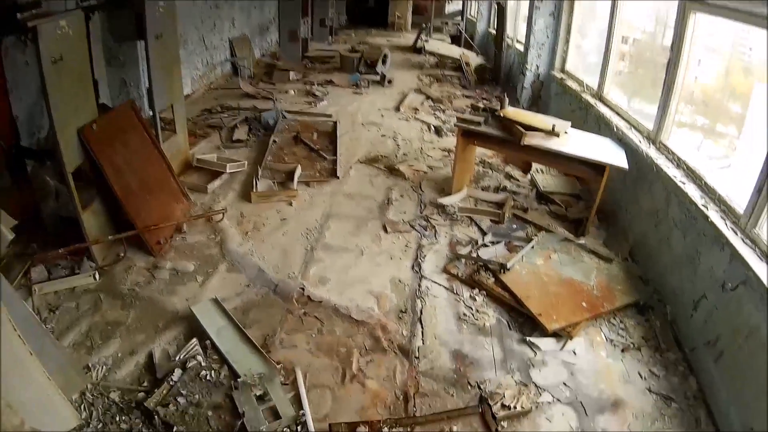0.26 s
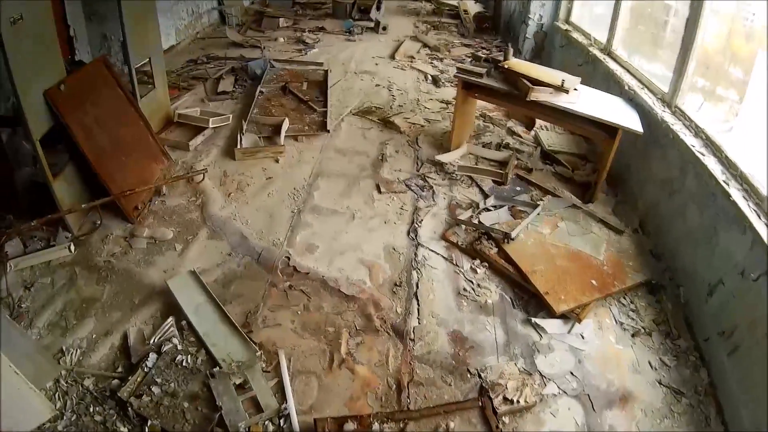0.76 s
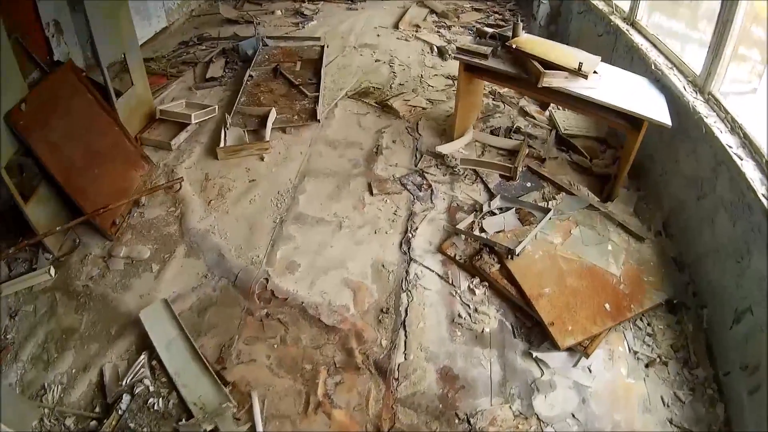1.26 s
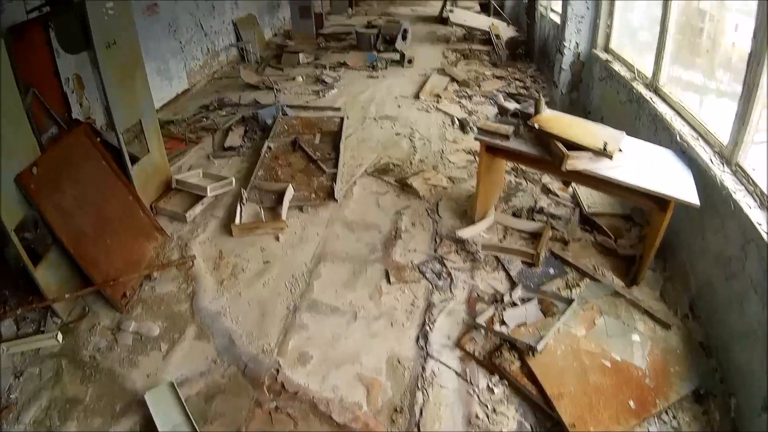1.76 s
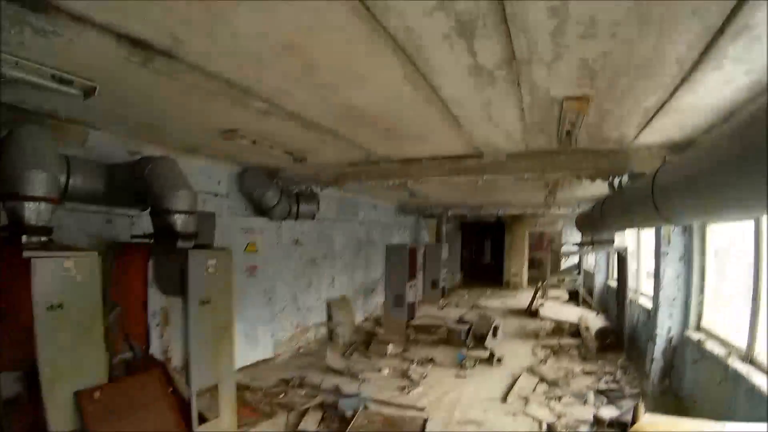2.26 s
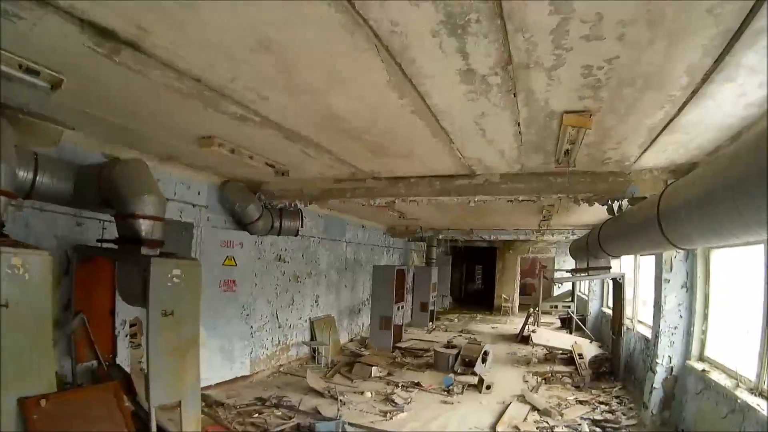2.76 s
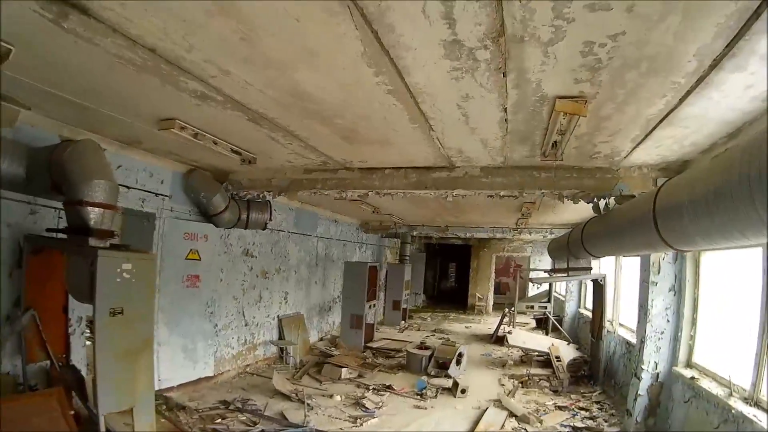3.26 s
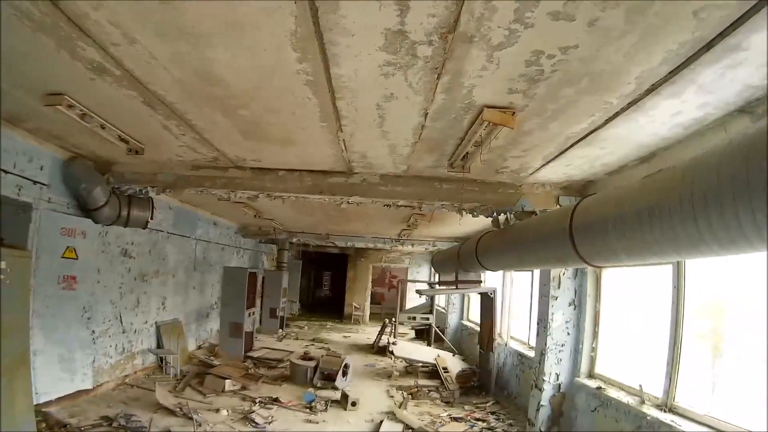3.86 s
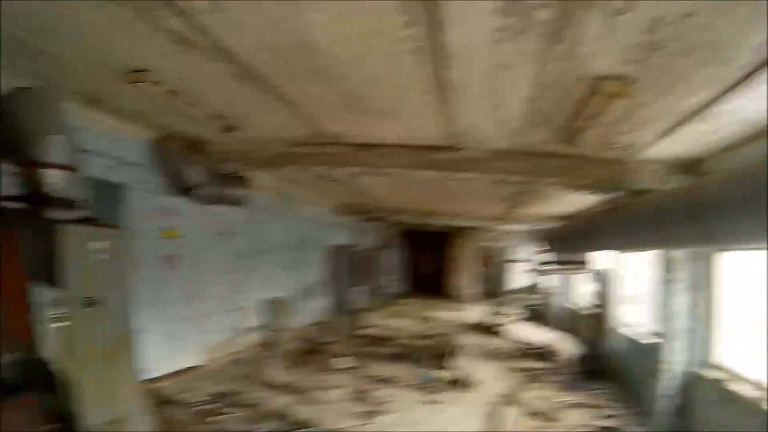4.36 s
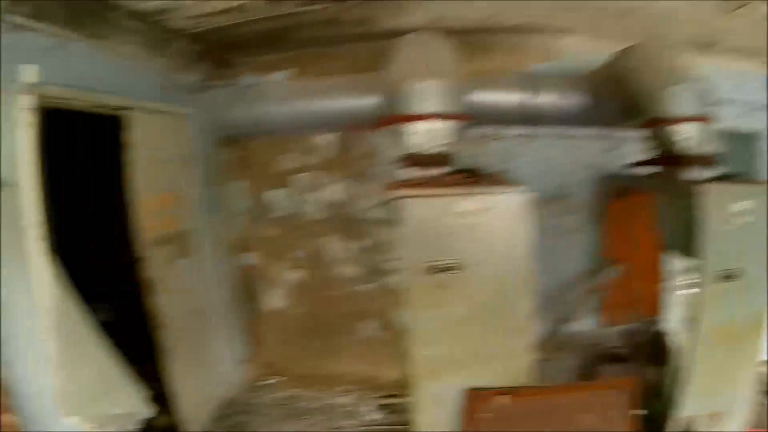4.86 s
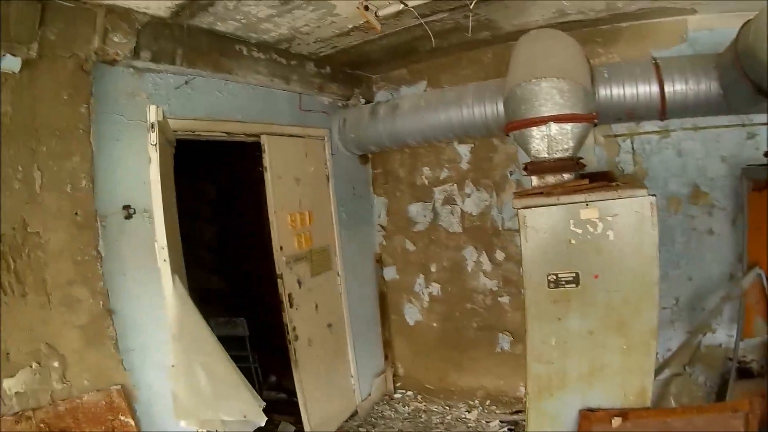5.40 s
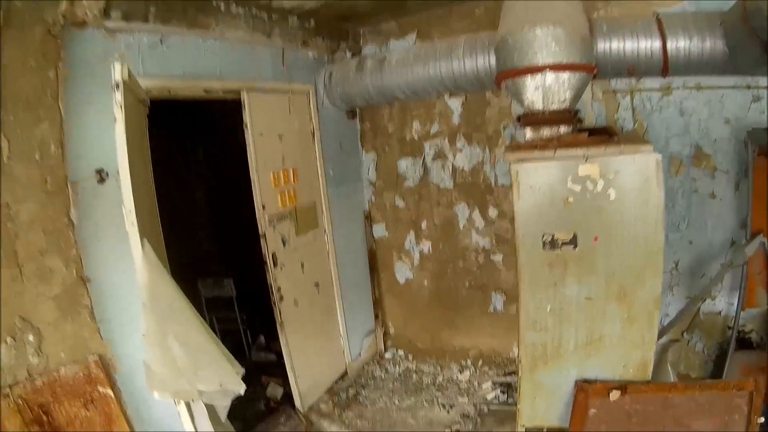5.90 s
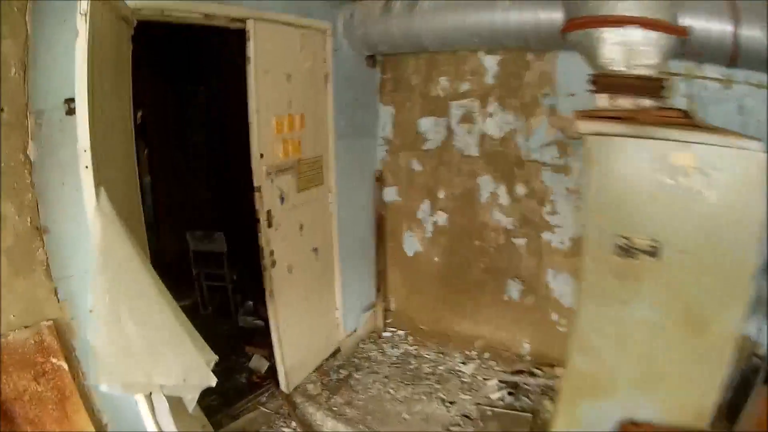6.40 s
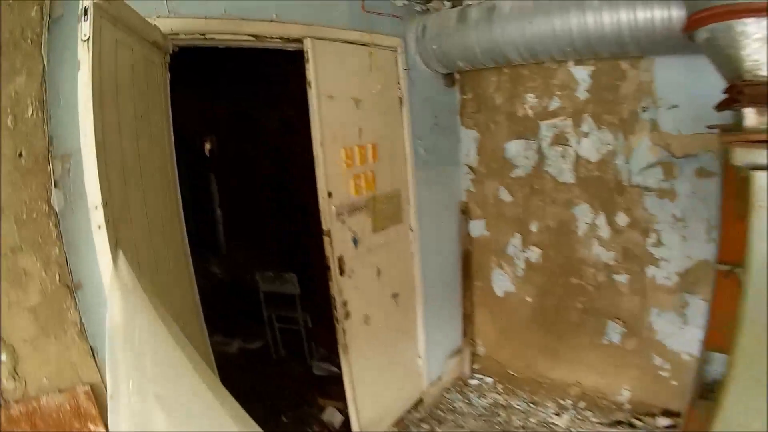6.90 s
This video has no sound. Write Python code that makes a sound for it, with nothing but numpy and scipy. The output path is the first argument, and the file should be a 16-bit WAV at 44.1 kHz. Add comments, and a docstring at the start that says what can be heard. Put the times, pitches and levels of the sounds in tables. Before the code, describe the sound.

Grit stirs faintly under a shoe at the start, in a bare, abandoned concrete hall. After a soft heel thump near 0.8 seconds, four slow footsteps crush broken plaster and tile, at about 1.1, 1.9, 2.8 and 3.5 seconds. Each is a few hard cracks and bright ticks over a short shower of crumbs and grit; the fourth is a little softer. From 4 to 5 seconds the feet shift on the rubble with lighter crunches and a soft knock. After a brief lull, faint shuffles and small crackles come between about 5.7 and 7.1 seconds. The feet are close below a hand-held microphone. The hall adds a short echo and a faint, narrow ring after each step. Underneath lie quiet room tone and hiss, a barely audible thin whine and a few tiny handling bumps.

```python
"""Grit stirs faintly under a shoe, then four slow steps crush plaster and tile in a bare concrete hall.
Each step is a few hard cracks over showers of crumbs and grit that last while the sole bears down.
Afterwards the feet shift lightly on the rubble, close below the microphone of a hand-held camera.
Floor, walls and ceiling answer, and a faint narrow ring hangs on.
The camera adds hiss, a thin whine and small handling bumps."""
import sys
import numpy as np
from scipy import signal
from scipy.fft import rfft, irfft, next_fast_len
from scipy.io import wavfile
from scipy.ndimage import map_coordinates

SR = 44100
rng = np.random.default_rng(int(sys.argv[2]) if len(sys.argv) > 2 else 0)


def generate_wav(sig):
    """Save sig (samples, or channels by samples) to the path in sys.argv[1] as 16-bit PCM at SR."""
    pcm = np.round(np.clip(np.atleast_2d(sig).T, -1, 1) * 32767).astype(np.int16)
    wavfile.write(sys.argv[1], SR, pcm)


N = 314874
TOP_HZ = 15700  # the camera's band limit


def amp(db):
    """Decibels to gain."""
    return 10 ** (np.asarray(db) / 20)


def unit(x):
    """Scale to rms 1."""
    return x / np.sqrt(np.mean(x ** 2) + 1e-20)


def along(points, hz):
    """Interpolate (Hz, value) points on a log frequency axis."""
    point_hz, values = np.transpose(points)
    return np.interp(np.log(hz + 1), np.log(point_hz + 1), values)


def below(hz, corner_hz):
    """Gain of a steep low-pass."""
    return 1 / (1 + (hz / corner_hz) ** 6)


def wobble(rate):
    """A smooth random curve, rate knots a second."""
    knots = rng.standard_normal(int(N * rate / SR) + 4)
    return map_coordinates(knots, [np.arange(N) * rate / SR])


def filtered(x, response):
    """Shape x by a gain given as a function of Hz."""
    size = next_fast_len(N + SR // 2)
    return irfft(rfft(x, size) * response(np.fft.rfftfreq(size, 1 / SR)), size)[:N]


def minimum_phase(gain):
    """The shortest impulse response with this gain."""
    cepstrum = irfft(np.log(np.maximum(gain, 1e-6)))
    half = len(cepstrum) // 2
    cepstrum[1:half] *= 2
    cepstrum[half + 1:] = 0
    return irfft(np.exp(rfft(cepstrum)))


def add_at(track, start_s, sound):
    """Mix a sound in from start_s, as far as the track reaches."""
    span = track[round(start_s * SR):][:len(sound)]
    span += sound[:len(span)]


# Room tone and hiss at the microphone. Each row: frequency in Hz, relative spectral level in dB.
ROOM_TONE = [(20, -7), (50, -17.5), (120, -15.5), (230, -17), (550, -22.5), (1000, -27.5), (2500, -35),
             (6000, -37), (15000, -37.5)]


def background(air_db=-60, whine_db=-80.5, whine_hz=8660):
    """Still air and microphone hiss, wavering slightly, with a narrow electronic whine."""
    air = unit(filtered(rng.standard_normal(N), lambda hz: amp(along(ROOM_TONE, hz))))
    whine = unit(filtered(rng.standard_normal(N), lambda hz: below(hz - whine_hz, 75)))
    return amp(air_db + 0.4 * wobble(1.9)) * air + amp(whine_db) * whine


# The grip shifts on the camera, right at the microphone. Each row: start in seconds, relative level in dB.
GRIP_BUMPS = [(0.027, -47.5), (0.469, -47.5), (5.213, -45), (5.544, -47.5), (6.042, -47), (7.027, -45.5)]


def handling(level_db=-3, settle_s=0.076, soft_hz=260):
    """Small jolts of the camera body: a soft step of pressure that leaks away."""
    out, t = np.zeros(N), np.arange(SR // 2) / SR
    jolt = np.exp(-t / settle_s) - np.exp(-2 * np.pi * soft_hz * t)
    for start_s, db in GRIP_BUMPS:
        add_at(out, start_s, amp(db + level_db) * jolt)
    return out


def duct_ring(feet, level_db=-25, centre_hz=1420, width_hz=330, t60_s=1.8):
    """A faint, narrow ring hangs in the hall after each step, as from sheet-steel ducts and cabinets."""
    t = np.arange(2 * SR) / SR
    edges_hz = [centre_hz - width_hz / 2, centre_hz + width_hz / 2]
    band = signal.butter(2, edges_hz, "bandpass", fs=SR, output="sos")
    tail = rng.standard_normal(len(t)) * amp(-60 * t / t60_s)
    ring = signal.sosfilt(band, tail / np.linalg.norm(tail))
    return amp(level_db) * signal.fftconvolve(feet, ring)[:N]


# The bare concrete hall all around. Each row: frequency in Hz, time to fall 60 dB in seconds.
HALL_DECAY = [(150, 0.81), (500, 0.48), (1300, 0.49), (4000, 0.39), (8000, 0.32), (15000, 0.31)]


def hall(early_db, tail_db, early_life_s=0.005, build_s=0.0034, echoes_per_s=2500):
    """From one spot to the microphone: direct sound, echoes off floor and cabinets, the long tail."""
    t = np.arange(SR * 3 // 5) / SR
    hz, frame_s, spectra = signal.stft(rng.standard_normal(len(t)), SR, nperseg=256)
    decay = amp(-60 * frame_s / along(HALL_DECAY, hz)[:, None])
    tail = signal.istft(spectra * decay, SR, nperseg=256)[1][:len(t)]
    tail *= 1 - np.exp(-t / build_s)
    early = rng.standard_normal(len(t)) * (rng.random(len(t)) < echoes_per_s / SR)
    early *= np.sqrt(t) * np.exp(-2 * t / early_life_s)
    response = amp(early_db) * early / np.linalg.norm(early) + amp(tail_db) * tail / np.linalg.norm(tail)
    response[0] += 1  # direct sound
    return response


# Hollow thumps of heels and loose boards, down at floor level.
# Each row: start in seconds, level in dB before the hall, pitch in Hz.
HEEL_THUMPS = [(0.755, -35.5, 474), (0.761, -32, 278), (0.793, -38.5, 407), (1.07, -34, 278),
               (1.885, -39, 188), (1.922, -36, 183), (3.348, -35, 450), (4.221, -44, 323),
               (4.725, -33.5, 476), (6.506, -39.5, 330)]


def thumps(cycles_to_peak=0.46, lowest_hz=140):
    """A board or the bare floor gives a few heavily damped swings, with no deep bass."""
    out, t = np.zeros(N), np.arange(SR // 20) / SR
    for start_s, db, hz in HEEL_THUMPS:
        age = hz * t / cycles_to_peak
        swing = np.sin(2 * np.pi * hz * t) * age * np.exp(1 - age)  # the soft sole rounds the attack
        heard = signal.fftconvolve(swing, hall(early_db=-2, tail_db=-1.5))
        add_at(out, start_s, amp(db) * heard)
    return signal.sosfilt(signal.butter(2, lowest_hz, "highpass", fs=SR, output="sos"), out)


# Broken plaster and tile, heard from close above. Each row: frequency in Hz, relative spectral level in dB.
RUBBLE_SPECTRUM = [(60, -52), (130, -31), (250, -10.5), (550, -5), (1250, -4.5), (2000, -5.5), (2500, -9.5),
                   (3000, -14.5), (3800, -13), (5300, -19), (7000, -24.5), (11200, -29.5), (13200, -38.5),
                   (15000, -33)]
# Loose tiles and boards under the rubble. Each row: resonance in Hz, width in Hz, lift in dB.
SLAB_RESONANCES = [(174, 59, 4), (292, 57, 1.5), (468, 12, 7.5), (607, 96, 2.5), (878, 50, 1.5),
                   (990, 22, 2), (1207, 23, 3), (1330, 340, 2.5), (1581, 68, 2.5), (2480, 310, 5),
                   (2686, 52, 2)]


def rubble(hz):
    """Gain of the broken floor, with the resonances of its loose slabs."""
    lift_db = sum(db / (1 + (2 * (hz - centre) / width) ** 2) for centre, width, db in SLAB_RESONANCES)
    return amp(along(RUBBLE_SPECTRUM, hz) + lift_db)


# The loudest single grains of grit, close and fairly dry. Each row: start in seconds, relative level in dB.
GRIT_SNAPS = [(0.0277, -38.5), (0.789, -36), (1.0647, -22), (1.1084, -30), (1.1643, -21), (1.3275, -26),
              (1.471, -31.5), (1.9858, -19.5), (2.0117, -29.5), (2.1792, -14.5), (2.1923, -15),
              (2.7716, -6), (3.5474, -20.5), (3.613, -13.5), (6.234, -39.5)]


def snaps(level_db=2, low_hz=4400, high_hz=9000, life_s=0.00095, size=1024):
    """A hard grain bursts with one short, bright tick."""
    out, hz = np.zeros(N), np.fft.rfftfreq(size, 1 / SR)
    band = np.sqrt(below(hz, high_hz) * (1 - below(hz, low_hz)))
    colour = minimum_phase(unit(rubble(hz) * band))
    for start_s, db in GRIT_SNAPS:
        burst = rng.standard_normal(size) * np.exp(-np.arange(size) / SR / life_s)
        tick = signal.fftconvolve(burst / np.linalg.norm(burst), colour)
        heard = signal.fftconvolve(tick, hall(early_db=-0.5, tail_db=-12))
        add_at(out, start_s, amp(db + level_db) * heard)
    return out


def grains(pitch_hz, octaves, cycles, spread_db, count, size):
    """Tiny fractures at random moments, each ringing a few cycles at its own pitch; rms 1."""
    starts = rng.integers(0, N, (count, 1))
    pitch, strength = np.clip(rng.standard_normal((2, count, 1)), -2, 2)
    hz = np.minimum(pitch_hz * 2 ** (octaves * pitch), TOP_HZ)
    turns = hz * np.arange(size) / SR
    rings = np.sin(2 * np.pi * turns) * np.exp(-turns / cycles)
    rings /= np.linalg.norm(rings, axis=1, keepdims=True)
    rings *= amp(spread_db * strength) * rng.choice([-1, 1], (count, 1))
    positions = starts + np.arange(size)
    return unit(np.bincount(positions.ravel(), rings.ravel(), N)[:N])


def sole_envelope(t, hold_s, attack_share=0.086, sag_db_per_s=20, release_s=0.018):
    """A sole takes the weight, the level sags as the crumbs get used up, then the sole lets go."""
    attack = 1 - np.exp(-t / (attack_share * hold_s))
    release = np.exp(-np.maximum(t - hold_s, 0) / release_s)
    return attack * amp(-sag_db_per_s * t) * release


# A sole bears down or slides, close below the microphone: weight shifts, four steps, a turn, shuffling.
# Each row: start in seconds, hold in seconds, relative level in dB, grit offset in dB, crumb ring in Hz.
SOLE_PRESSES = [(0.014, 0.29, -58.5, -8, 1460), (0.745, 0.26, -59.5, -13.5, 400),
                (1.061, 0.028, -33.5, -7, 900), (1.158, 0.043, -21.5, -14, 640),
                (1.217, .14, -35, -9, 1230), (1.396, 0.21, -46.5, -7.5, 1330),
                (1.735, 0.11, -50.5, -7.5, 1400), (1.907, 0.046, -21.5, -8.5, 1410),
                (1.969, .13, -28, -5.5, 1590), (2.105, 0.11, -30.5, -5.5, 1000),
                (2.457, 0.072, -52, -8, 1010), (2.731, 0.027, -35.5, -6, 1250),
                (2.748, 0.049, -25, -3, 1210), (2.81, 0.11, -32.5, -7.5, 1280),
                (3.195, .14, -55.5, -11, 880), (3.32, 0.1, -47.5, -11, 550),
                (3.434, 0.057, -35.5, -1, 1360), (3.523, 0.13, -33, 0, 1080),
                (3.648, .09, -39.5, -3.5, 1130), (4, 0.06, -51.5, -4.5, 1150),
                (4.184, 0.086, -45, -9, 1110), (4.333, 0.056, -39.5, -7.5, 1150),
                (4.51, 0.12, -45, -11, 1120), (4.696, 0.042, -37, -14.5, 646),
                (4.787, 0.2, -50.5, -9, 1470), (5.718, 0.26, -65.5, -2, 900), (6.086, .13, -54, -11, 1200),
                (6.39, 0.38, -52, -12.5, 700), (7.095, 0.037, -48, -16, 1070)]


def pressing(crumbs, ring_db=-1, ring_q=2.3):
    """The crumbs under each press, ringing at their own pitch, and the power of the grit among them."""
    pressed, grit_power = np.zeros((2, N))
    for start_s, hold_s, db, grit_db, ring_hz in SOLE_PRESSES:
        shower = crumbs[round(start_s * SR):][:SR]
        ring = signal.lfilter(*signal.iirpeak(ring_hz, ring_q, fs=SR), shower)
        weight = amp(db) * sole_envelope(np.arange(len(shower)) / SR, hold_s)
        add_at(pressed, start_s, weight * unit(shower + amp(ring_db) * ring))
        add_at(grit_power, start_s, (amp(grit_db) * weight) ** 2)
    return pressed, grit_power


def straining(level_db=-25, build_s=0.022):
    """Gain of the grating that builds up in each piece until it cracks."""
    power, ahead_s = np.zeros(N), np.arange(SR // 10)[::-1] / SR
    for crack_s, db, _, _ in SHARD_CRACKS:
        swell = amp(db + level_db) * np.exp(-ahead_s / build_s)
        power[:round(crack_s * SR)][-len(swell):] += swell ** 2
    return np.sqrt(power)


def chipping(level_db=-28.5, db_per_crack_db=1.074, rise_s=0.00067, life_s=0.037):
    """Power of the spray of chips that follows each crack."""
    power, t = np.zeros(N), np.arange(SR // 4) / SR
    spray = (1 - np.exp(-t / rise_s)) * np.exp(-t / life_s)
    for start_s, db, _, _ in SHARD_CRACKS:
        add_at(power, start_s, (amp(level_db + db_per_crack_db * db) * spray) ** 2)
    return power


def crunch(crumbs_db=-8, grit_db=-7, crumbs_below_hz=3150, grit_above_hz=2700, spots=72):
    """Crumbs and fine grit burst in dense showers under a pressing sole and around each crack."""
    crumbs = grains(pitch_hz=1207, octaves=0.89, cycles=1.07, spread_db=3, count=6000, size=256)
    crumbs = unit(filtered(crumbs, lambda hz: rubble(hz) * below(hz, crumbs_below_hz)))
    grit = grains(pitch_hz=8150, octaves=0.82, cycles=0.93, spread_db=0, count=14000, size=64)
    grit = unit(filtered(grit, lambda hz: rubble(hz) * (1 - below(hz, grit_above_hz))))
    pressed, grit_power = pressing(crumbs)
    underfoot = amp(crumbs_db) * (pressed + crumbs * straining())
    underfoot += grit * np.sqrt(amp(grit_db) ** 2 * grit_power + chipping())
    out = np.zeros(N)
    for stretch in np.array_split(np.arange(N), spots):  # the feet move, so the echoes change
        heard = signal.fftconvolve(underfoot[stretch], hall(early_db=-2.5, tail_db=-4.5))
        add_at(out, stretch[0] / SR, heard)
    return out


def shard(hz, ring_hz, knock_db, ring_db=8, ring_width=0.25, cutoff_ratio=1.98, knock_hz=380):
    """Gain of one piece: it clacks at its own pitch, duller when big, and knocks on the slab below."""
    ring = amp(ring_db / (1 + ((hz / ring_hz - 1) / ring_width) ** 2))
    colour = rubble(hz) * ring * np.sqrt(below(hz, cutoff_ratio * ring_hz))
    low = below(hz, knock_hz)
    clack, knock = unit(colour * (1 - low)), unit(colour * low)
    return np.hypot(clack, amp(knock_db) * knock)


# Pieces crack or tip under a shoe, close below the microphone: four steps, a turn, then shuffling.
# Each row: start in seconds, relative clack level in dB, knock against the clack in dB, ring in Hz.
SHARD_CRACKS = [(0.793, -35.5, -6, 864), (1.036, -28.5, -7, 1210), (1.064, -17, -9.5, 840),
                (1.109, -9, -14.5, 1270), (1.165, -11.5, -20, 1290), (1.173, -15.5, -30, 825),
                (1.325, -28.5, -16, 1350), (1.653, -31, -28, 1300), (1.74, -26, -14.5, 1360),
                (1.871, -25.5, -8, 820), (1.881, -14.5, -8, 740), (1.917, -13.5, -26, 900),
                (1.927, -22.5, -26, 750), (1.941, -14, -22.5, 1160), (2.074, -18, -28, 900),
                (2.18, -22.5, -31, 1290), (2.467, -40.5, -24, 670), (2.715, -33.5, -1, 1280),
                (2.752, -9, -34, 1260), (2.769, -9, -19, 1300), (2.825, -13, -24, 1270),
                (2.875, -21.5, -17, 1310), (3.219, -37.5, -37, 790), (3.443, -24, -14, 1250),
                (3.529, -15, -17.5, 1040), (3.54, -14, -42, 1130), (3.604, -16, -33, 1340),
                (3.699, -24.5, -24, 940), (4.001, -32.5, -41, 940), (4.195, -49, -19, 1260),
                (4.338, -30.5, -15.5, 1000), (4.677, -27, -11, 900), (4.697, -28, -9, 940),
                (4.716, -31, -7, 880), (5.741, -49.5, -8, 1200), (5.813, -39, -13, 870),
                (6.233, -40, -16, 1590), (6.266, -38.5, -7, 1080), (6.327, -34.5, -5.5, 880),
                (6.345, -42, -25, 835), (6.646, -33.5, -32, 885), (7.087, -38.5, -12, 1035)]


def cracks(level_db=7.5, size=4096):
    """Each piece gives way with one blow, which scatters off the rubble around it."""
    out, hz = np.zeros(N), np.fft.rfftfreq(size, 1 / SR)
    for start_s, db, knock_db, ring_hz in SHARD_CRACKS:
        blow = minimum_phase(shard(hz, ring_hz, knock_db))
        heard = signal.fftconvolve(blow, hall(early_db=4, tail_db=4, early_life_s=0.013))
        add_at(out, start_s, amp(db + level_db) * heard)
    return out


def scene():
    """Feet on rubble in the hall, close below one hand-held microphone."""
    feet = cracks() + thumps() + snaps() + crunch()
    return (feet + duct_ring(feet) + handling() + background())[None]


def record(dry):
    """The camera keeps nothing above its band limit."""
    return np.array([filtered(channel, lambda hz: hz < TOP_HZ) for channel in dry])


dry = scene()
out = record(dry)
generate_wav(out)
```